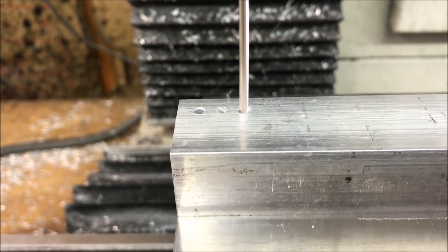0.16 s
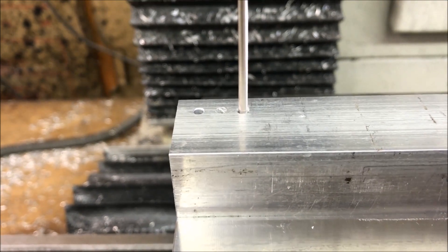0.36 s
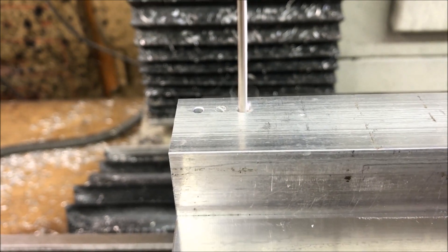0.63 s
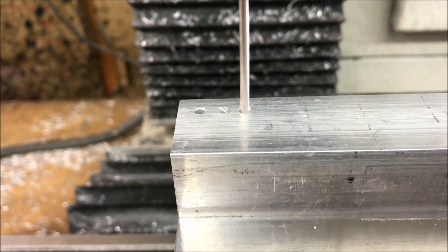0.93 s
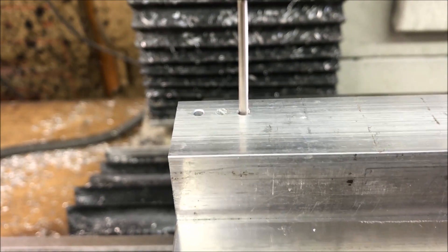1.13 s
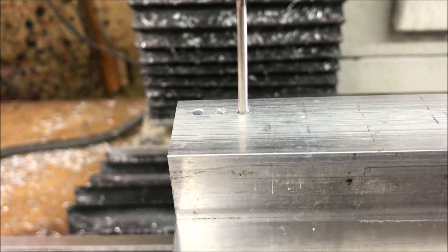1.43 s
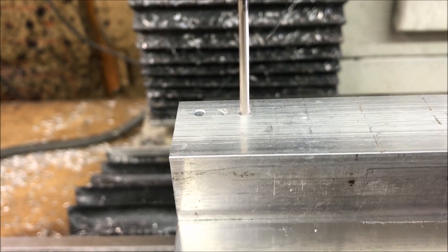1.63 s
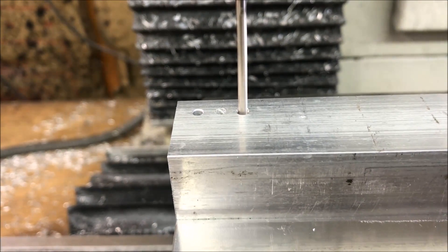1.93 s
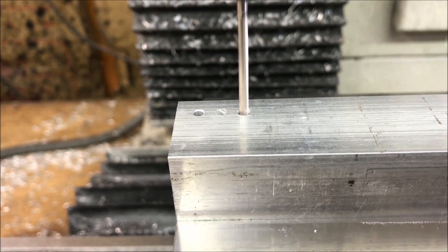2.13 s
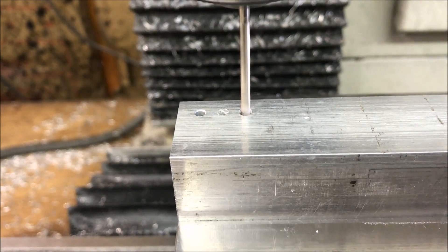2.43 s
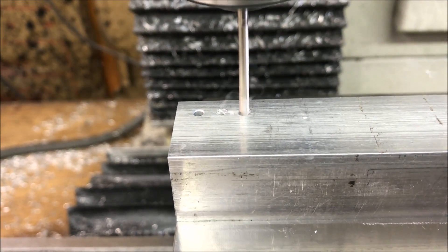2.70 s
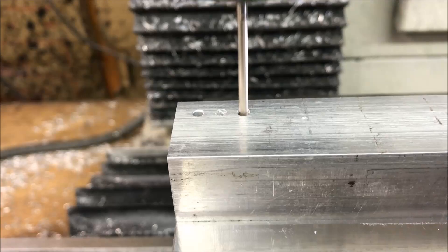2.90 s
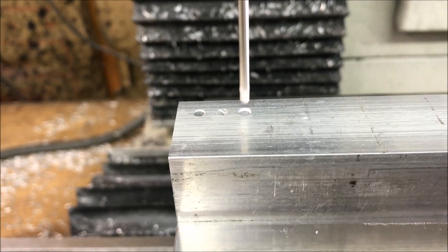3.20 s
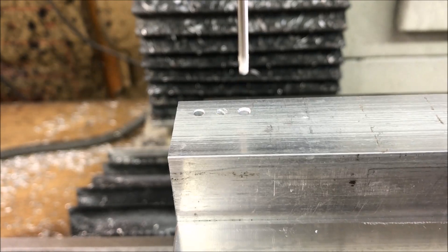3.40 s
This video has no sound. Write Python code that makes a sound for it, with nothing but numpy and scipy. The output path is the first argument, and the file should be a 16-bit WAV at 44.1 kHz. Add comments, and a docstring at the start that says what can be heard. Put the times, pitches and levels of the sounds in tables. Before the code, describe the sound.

Thin, high-pitched whine of a milling machine drilling aluminium, with coolant air hissing.

```python
"""Deep drilling in aluminium

A milling machine drills a deep, thin hole in a block and pulls the drill out at about 3.1 s. A rough whine
whistles in the hole and creeps up in pitch; a higher mode swells before the retreat. Coolant air hisses, and
the spindle and a second motor hum and beat against each other. The background hiss and hum sink in level
together, then return."""
import sys
import numpy as np
from scipy.fft import rfft, irfft, next_fast_len
from scipy.io import wavfile
from scipy.ndimage import map_coordinates

SR = 44100
rng = np.random.default_rng(int(sys.argv[2]) if len(sys.argv) > 2 else 0)


def materialize(psi):
    """Save the field psi as 16-bit PCM at rate SR to the path in sys.argv[1].

    A 1-D psi becomes a single channel; in a 2-D psi each row is a channel.
    """
    bounded = np.clip(np.atleast_2d(psi).T, -1, 1)
    quanta = np.round(bounded * 32767).astype(np.int16)
    wavfile.write(sys.argv[1], SR, quanta)


N = 156555


def amp(db):
    """Amplitude ratio of a level in decibels."""
    return 10 ** (np.asarray(db) / 20)


def unit(x):
    """Normalisation to rms 1."""
    return x / np.sqrt(np.mean(np.abs(x) ** 2) + 1e-20)


def curves(rows):
    """Linear interpolation: one value per sample for each column after the time."""
    time_s, *columns = np.transpose(rows)
    return [np.interp(np.arange(N) / SR, time_s, column) for column in columns]


def wobble(rate_hz):
    """Random modulation: a smooth curve through rate_hz Gaussian values a second."""
    knots = rng.standard_normal(int(N * rate_hz / SR) + 4)
    return map_coordinates(knots, [np.arange(N) * rate_hz / SR])


# Resonances of the machine's enclosure: centre_hz, width_hz, boost_db
ENCLOSURE_MODES = [(1095, 60, 4), (1225, 45, 6), (1475, 45, 4), (1820, 50, 3), (2070, 160, 4),
                   (2740, 100, 5.5), (3640, 190, 5.5), (4520, 110, 3), (5730, 130, 6), (7170, 140, 6.5),
                   (7920, 130, 5), (9950, 70, 3), (11850, 230, 3), (13350, 400, 4)]

def noise(spectrum, enclosed=False):
    """Source and filter: white noise shaped by a spectrum and, if enclosed, by the enclosure; rms 1."""
    size = next_fast_len(N + 8192)
    f = np.fft.rfftfreq(size, 1 / SR)
    hz, db = np.transpose(spectrum)
    gain_db = np.interp(np.log(f + 1), np.log(hz), db, left=-np.inf, right=-np.inf)
    if enclosed:
        gain_db += sum(boost * np.exp(-((f - centre) / width) ** 2)
                       for centre, width, boost in ENCLOSURE_MODES)
    white = rfft(rng.standard_normal(size))
    return unit(irfft(white * amp(gain_db), size)[:N])


def ringing(shape, centre_hz, saturation=0.17):
    """Randomly driven resonance about a moving centre; its swells are gently saturated."""
    size = next_fast_len(N)
    offset_hz, db = np.transpose(shape)
    gain = amp(np.interp(np.fft.fftfreq(size, 1 / SR), offset_hz, db, left=-np.inf, right=-np.inf))
    excitation = rng.standard_normal(size) + 1j * rng.standard_normal(size)
    envelope = unit(np.fft.ifft(gain * excitation)[:N])
    envelope /= np.sqrt(1 + saturation * np.abs(envelope) ** 2)
    carrier = np.exp(2j * np.pi * np.cumsum(centre_hz) / SR)
    return unit(np.real(envelope * carrier))


# Joint strength of the whine's main mode and its partner: time_s, level_db
WHINE_LEVEL = [(0, -32), (.17, -32.5), (.3, -29.5), (.6, -30), (.78, -28.5), (1.2, -25), (1.42, -26),
               (1.5, -30), (1.55, -24), (1.63, -28), (1.7, -26.5), (1.8, -27), (2.03, -26), (2.14, -28.5),
               (2.3, -25.5), (2.46, -29.5), (2.72, -29.5), (2.84, -33), (2.96, -30), (3.04, -25.5),
               (3.2, -44), (3.3, -41), (3.55, -51)]
# Centre of the main mode: time_s, pitch_hz
MAIN_PITCH = [(0, 6400), (1.3, 6400), (1.9, 6390), (2.3, 6455), (2.6, 6505), (2.95, 6525), (3.08, 6390),
              (3.5, 6440)]
# Resonance curve about that centre: offset_hz, gain_db
MAIN_SHAPE = [(-700, -55), (-480, -33), (-300, -14), (-150, -6.5), (-50, -2.5), (12, 0), (90, -7.5),
              (220, -19), (450, -27), (900, -50)]
# Broader partner mode just below, relative to the main mode: time_s, level_db
PARTNER_LEVEL = [(0, -1), (1.3, -2.5), (1.6, -7), (2.35, -16), (2.95, -16), (3.08, -11), (3.2, -5)]
# Resonance curve of the partner: frequency_hz, gain_db
PARTNER_SPECTRUM = [(5800, -45), (5940, -20), (6080, -5), (6230, 0), (6400, -6), (6740, -11), (7000, -35)]
# Swell of the higher mode: time_s, relative_level_db
UPPER_LEVEL = [(0, -43.5), (.7, -45.5), (1.4, -45.5), (1.84, -48), (2.4, -43.5), (2.7, -41), (2.96, -38),
               (3.13, -53), (3.22, -56), (3.5, -49.5)]
# Resonance curve of the higher mode: frequency_hz, gain_db
UPPER_SPECTRUM = [(7000, -25), (8250, -22), (8700, -7), (9000, -9.5), (9240, 1), (9520, -5.5), (9800, -16),
                  (10800, -18.5), (12500, -21)]

def drill(flutter_db=1, flutter_hz=45, upper_gain_db=1.5):
    """Whistling whine: a rough tone sounds in a close pair of modes and a higher one."""
    level_db, = curves(WHINE_LEVEL)
    pitch_hz, = curves(MAIN_PITCH)
    partner_db, = curves(PARTNER_LEVEL)
    upper_db, = curves(UPPER_LEVEL)
    main = ringing(MAIN_SHAPE, pitch_hz)
    partner = amp(partner_db) * noise(PARTNER_SPECTRUM)
    pair = (main + partner) / np.hypot(1, amp(partner_db))  # constant total power
    grip_db = flutter_db * wobble(flutter_hz)
    upper = amp(upper_db + upper_gain_db + .5 * grip_db) * noise(UPPER_SPECTRUM)
    return amp(level_db + grip_db) * pair + upper


# Strength of the cut's thin singing: time_s, level_db
SINGING_LEVEL = [(0, -60), (1.75, -66), (1.93, -56), (2.1, -70), (2.5, -68), (2.7, -61), (2.82, -68),
                 (2.98, -59), (3.12, -72)]
# Its resonance curve: frequency_hz, gain_db
SINGING_SPECTRUM = [(3400, -37), (3570, 6), (3680, 11), (3770, 15), (3950, -46)]

def singing(flicker_db=3):
    """Narrow-band resonance: a faint lower mode of the cut comes and goes."""
    level_db, = curves(SINGING_LEVEL)
    flicker = amp(flicker_db * wobble(25.3))
    return amp(level_db) * unit(flicker * noise(SINGING_SPECTRUM))


# Relative levels of the two bands of the hiss: time_s, body_db, fizz_db
HISS_LEVELS = [(0, -43.5, -43), (.03, -36, -38), (.45, -36.5, -39), (.8, -39.5, -41.5), (1.33, -42.5, -43),
               (1.65, -47.5, -50), (1.97, -50, -48.5), (2.3, -52, -51.7), (2.7, -53, -52.5),
               (3.0, -52.5, -50), (3.25, -48.5, -54.5), (3.55, -47, -49)]
# Rushing body of the air: frequency_hz, gain_db
BODY_SPECTRUM = [(25, -22), (55, -3.5), (110, -2), (160, -5), (240, -1.5), (330, -5), (450, -9), (700, -3),
                 (1000, 0), (1600, -4), (2300, -4.5), (3150, -6.5), (4500, -5), (7000, -4.5), (11000, -56)]
# Fine treble fizz: frequency_hz, gain_db
FIZZ_SPECTRUM = [(2500, -52), (4500, -7.5), (7000, -5), (8700, -2), (10400, -4.5), (12500, 0), (13700, -3),
                 (14300, -0.5), (15200, 2.5), (15800, -4)]

def hiss(gain_db=3.5, body_flutter_db=0.03, fizz_flutter_db=0.95):
    """Flow noise: coolant air makes a rush and a fizz, both coloured by the enclosure."""
    body_db, fizz_db = curves(HISS_LEVELS)
    body = amp(body_db + body_flutter_db * wobble(20)) * noise(BODY_SPECTRUM, enclosed=True)
    fizz = amp(fizz_db + fizz_flutter_db * wobble(500)) * noise(FIZZ_SPECTRUM, enclosed=True)
    return amp(gain_db) * (body + fizz)


# Harmonics of the spindle's rotation: shaft_multiple, relative_level_db
SPINDLE_ORDERS = [(2, -59.5), (3, -61.5), (4, -56.5), (5, -70), (7, -74), (8, -67.5), (9, -70.5),
                  (11, -66.5), (12, -69)]

def hum(shaft_hz=28.4, motor_hz=116.62, beat_crest_s=.125, waver_db=1.5, gain_db=-2, follow=0.96):
    """Beating: the spindle's fourth harmonic and a second motor interfere three times a second."""
    t = np.arange(N) / SR - beat_crest_s
    spindle = [(order * shaft_hz, db) for order, db in SPINDLE_ORDERS]
    motor = [(motor_hz, -57.5), (2 * motor_hz, -61)]  # pitch_hz, relative_level_db
    tones = np.zeros(N)
    for hz, db in spindle + motor:
        phase = rng.uniform(0, 2 * np.pi)
        if abs(hz - motor_hz) <= shaft_hz / 2:
            phase = 0  # the beating pair is in phase at the crest
        tones += amp(db + waver_db * wobble(5.1)) * np.cos(2 * np.pi * hz * t + phase)
    body_db, _ = curves(HISS_LEVELS)
    swell_db = follow * (body_db - body_db.mean())  # sinks and returns with the hiss
    return np.sqrt(2) * tones * amp(gain_db + swell_db)


# Strength of the scraping in the hole: time_s, level_db
SCRAPE_LEVEL = [(0, -56), (.8, -42), (1.5, -40), (2.3, -46.5), (2.95, -41.5), (3.1, -43.5), (3.25, -64),
                (3.55, -50)]
# Its broad spectrum: frequency_hz, gain_db
SCRAPE_SPECTRUM = [(600, -23), (1100, -13.5), (2100, -8.5), (2600, -10.5), (3650, -6.5), (4900, -6),
                   (5400, 2.5), (5800, -2), (6900, 3.5), (7350, -2.5), (7600, -3), (10500, -5.5),
                   (13000, -12), (15000, -29)]

def scrape(grain_db=1.4, grain_hz=300):
    """Sliding friction: chips and flutes scrape the wall of the hole, making grainy broadband noise."""
    level_db, = curves(SCRAPE_LEVEL)
    return amp(level_db + grain_db * wobble(grain_hz)) * noise(SCRAPE_SPECTRUM, enclosed=True)


# Brief drops in the broadband noise: centre_s, depth_db
NOISE_DIPS = [(.154, 18), (.304, 18), (.474, 15), (1.519, 18), (1.924, 14), (2.051, 16), (2.161, 19),
              (2.586, 19), (2.714, 16), (2.97, 16), (3.354, 18), (3.417, 16)]

def dips(half_width_s=.0072):
    """Amplitude modulation: a gain that drops for an instant now and then."""
    t = np.arange(N) / SR
    return amp(-sum(db * np.exp(-((t - centre_s) / half_width_s) ** 2) for centre_s, db in NOISE_DIPS))


# Thin tones in each dip, relative to the hiss's body curve: pitch_hz, scatter_hz, level_db
DIP_TONES = [(1150, 90, -8), (3750, 200, -12), (11800, 200, -10), (13300, 250, -5), (15100, 200, -9)]

def dip_tones(half_width_s=.011, scatter_db=2.5):
    """Gaussian tone bursts: short, thin blips sound during each brief dropout of the hiss."""
    t, bursts = np.arange(N) / SR, np.zeros(N)
    body_db, _ = curves(HISS_LEVELS)
    for centre_s, _ in NOISE_DIPS:
        near = np.abs(t - centre_s) < 3 * half_width_s
        offset_s = t[near] - centre_s
        window = np.exp(-(offset_s / half_width_s) ** 2)
        for hz, scatter_hz, db in DIP_TONES:
            detune, strength, phase = rng.standard_normal(3)
            tone = np.cos(2 * np.pi * ((hz + scatter_hz * detune) * offset_s + phase))
            bursts[near] += amp(db + scatter_db * strength) * window * tone
    return amp(body_db) * bursts


# Strength of the open spray as the drill leaves the hole: time_s, level_db
SPRAY_LEVEL = [(0, -90), (2.85, -92), (3.1, -50.5), (3.25, -48), (3.4, -44.5), (3.55, -40)]
# Its spectrum: frequency_hz, gain_db
SPRAY_SPECTRUM = [(250, -5.5), (380, 3.5), (800, 1), (1300, -1), (2400, -6), (5000, -12), (10300, -4),
                  (11900, 2.5), (13000, 2.5), (14200, 3), (15700, 2)]

def spray(flutter_db=.5):
    """Jet noise: coolant air blows freely over the block as the drill lifts."""
    level_db, = curves(SPRAY_LEVEL)
    return amp(level_db + flutter_db * wobble(30)) * noise(SPRAY_SPECTRUM, enclosed=True)


def scene():
    """Superposition: all sources add in one channel; the dips act on the broadband noise alone."""
    pitched = drill() + singing() + hum() + dip_tones()
    broadband = hiss() + spray() + scrape()
    return (pitched + dips() * broadband)[None]


def record(dry, cutoff_hz=15750):
    """Band limiting: an ideal low-pass filter removes everything above the cutoff."""
    size = next_fast_len(N + SR // 2)
    passband = np.fft.rfftfreq(size, 1 / SR) < cutoff_hz
    return irfft(rfft(dry, size) * passband, size)[..., :N]


dry = scene()
out = record(dry)
materialize(out)
```